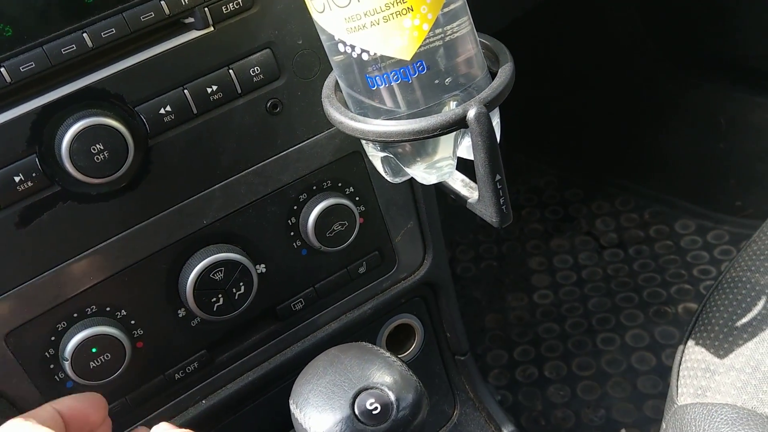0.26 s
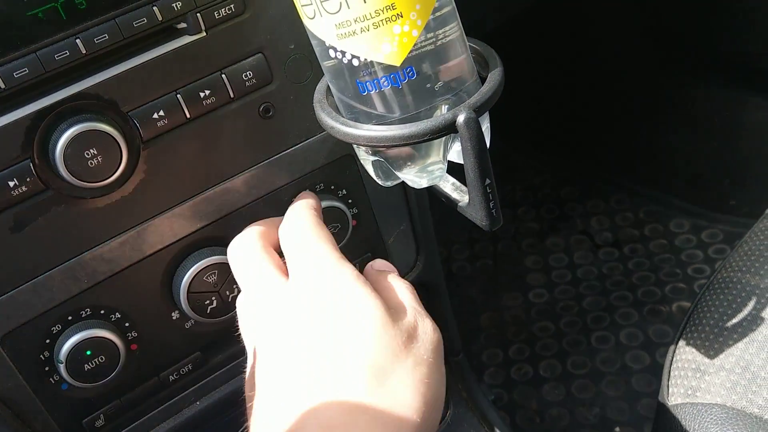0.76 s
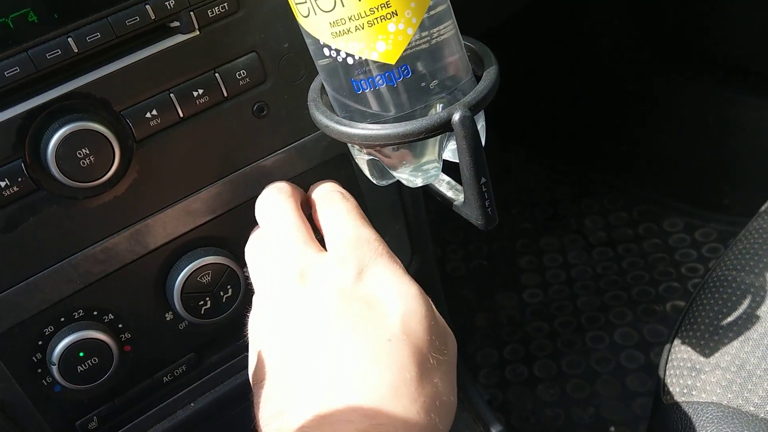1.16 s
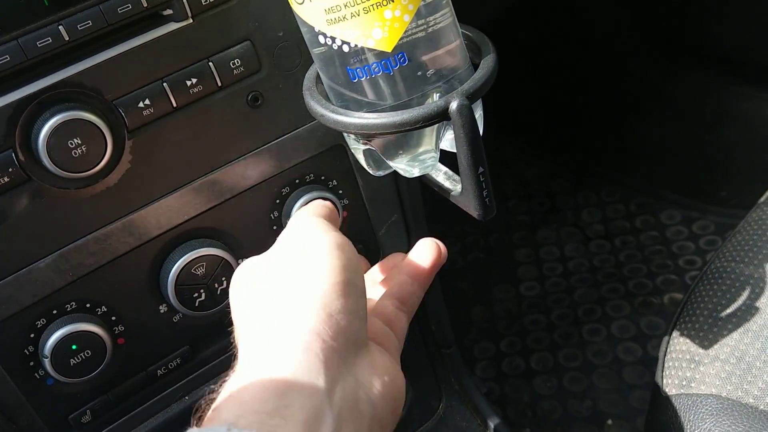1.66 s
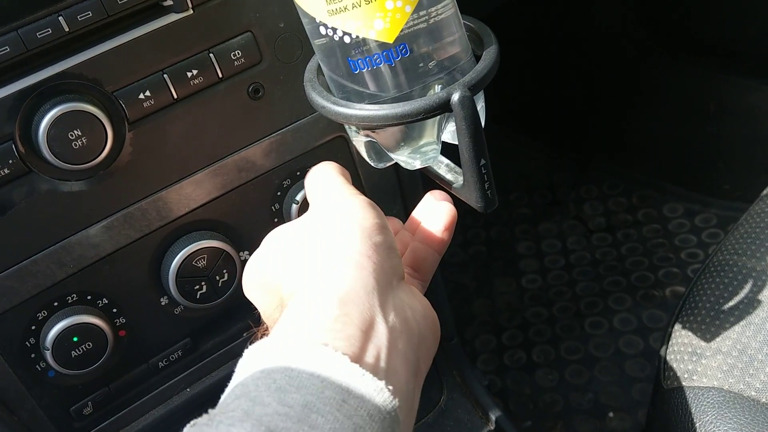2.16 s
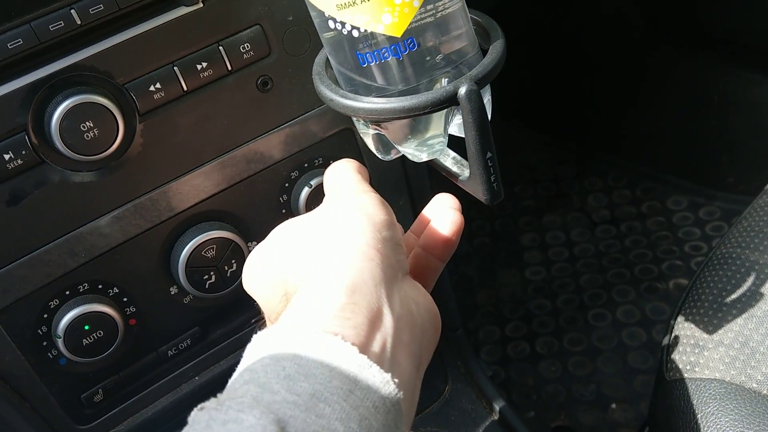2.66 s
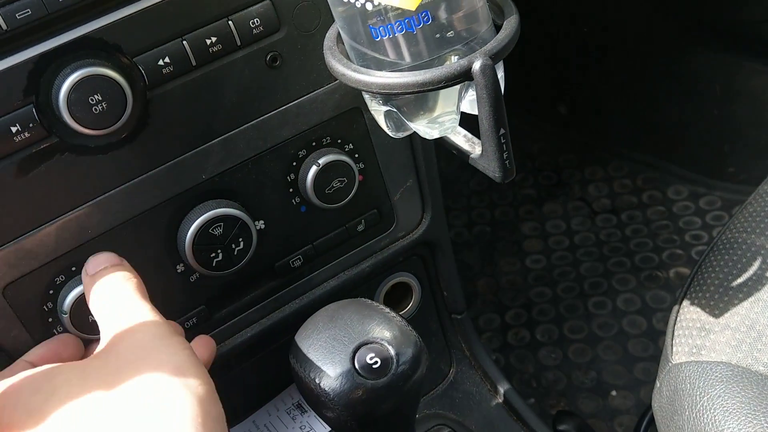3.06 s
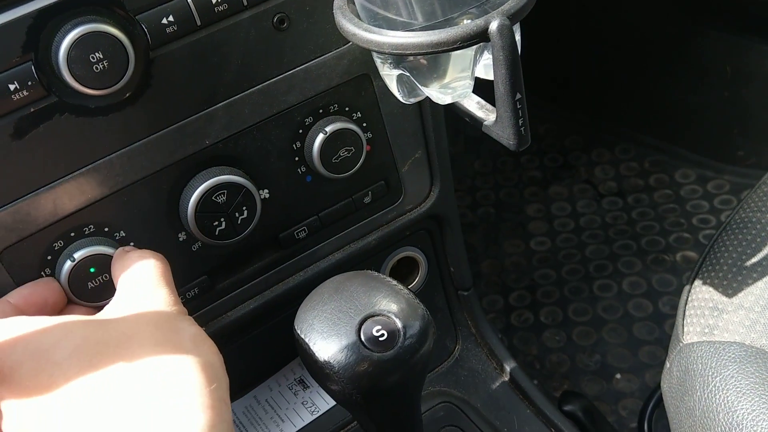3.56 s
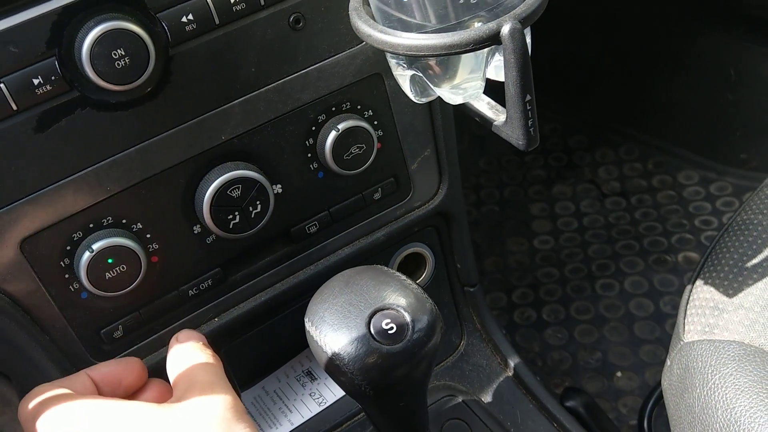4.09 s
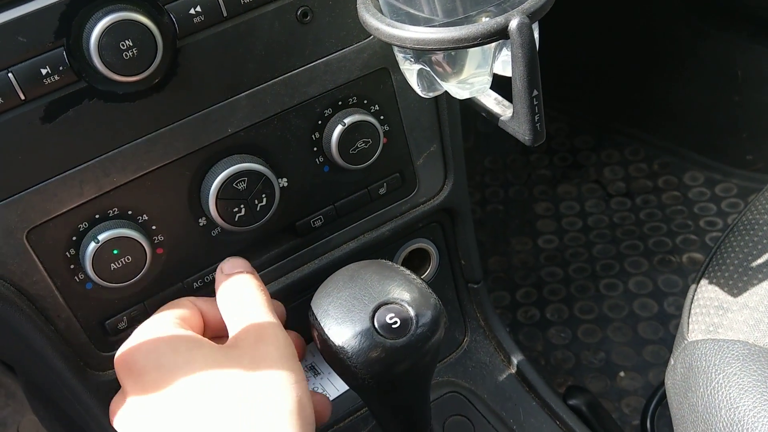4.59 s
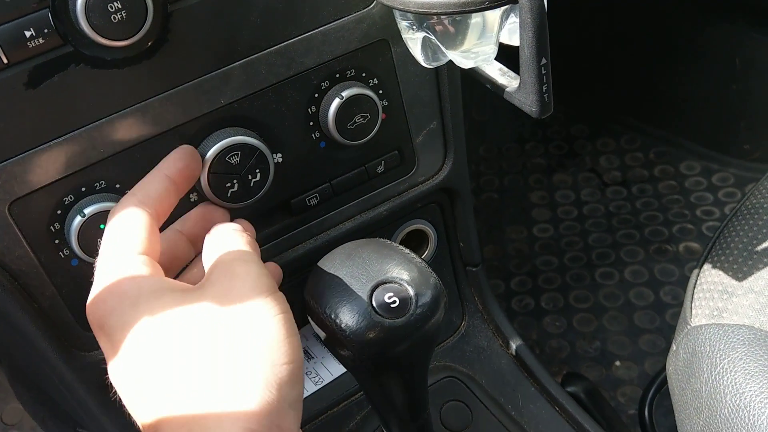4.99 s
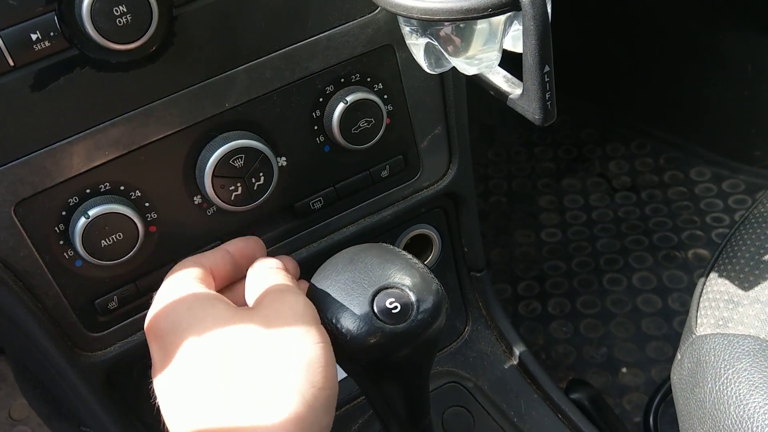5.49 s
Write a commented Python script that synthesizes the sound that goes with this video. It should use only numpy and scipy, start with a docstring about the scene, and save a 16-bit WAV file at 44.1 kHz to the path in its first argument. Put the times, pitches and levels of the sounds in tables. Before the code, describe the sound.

Inside a parked car, the ventilation blower rushes steadily through the ducts, a broad, slightly hollow sound of air over the deep hum of the idling engine. A dial gives two small, bright clicks right at the start and two more at about 1.3 seconds. Through the first three seconds, the air buffets the close microphone in soft low puffs, mostly on the left, strongest between 1 and 1.7 seconds. From about 2.5 seconds the fan winds down, its rush thinning to a faint hiss by 4.5 seconds. A few very faint dial ticks fall between 3.2 and 3.7 seconds. The engine keeps idling throughout, sagging slightly, with a few soft low thumps after 4 seconds. At about 5.4 seconds, thin plastic crackles close by in one quick burst of little snaps.

```python
"""A ventilation blower rushes through the ducts of a parked car, then winds down over the idling engine.
The rush is turbulent air shaped by duct resonances; the engine's firing booms in the cabin.
Wind buffets mainly the left microphone port, a few low thumps reach both, and a hand ticks the dials.
Near the end thin plastic crackles close by."""
import sys
import numpy as np
from scipy import signal
from scipy.fft import rfft, irfft
from scipy.io import wavfile
from scipy.ndimage import uniform_filter1d

SR = 44100
rng = np.random.default_rng(int(sys.argv[2]) if len(sys.argv) > 2 else 0)


def store_pcm(level_fs):
    """Save levels as 16-bit WAV."""
    pcm = np.round(np.clip(level_fs, -1, 1) * 32767).astype(np.int16)
    wavfile.write(sys.argv[1], SR, np.atleast_2d(pcm).T)


N = 252847

# air flow: t/s, level/dB
AIR_FLOW = [(0, -34), (.7, -33.5), (1.34, -33.5), (1.66, -33.5), (2.3, -34.5), (2.65, -36), (2.9, -38),
            (3.14, -41), (3.7, -43.5), (4.05, -45.5), (4.4, -47), (4.68, -48), (4.8, -48.5), (5.03, -49.5),
            (5.35, -49), (5.73, -53)]
FULL_FLOW_DB = -34.5
# left-right likeness of the cabin sound: f/Hz, coherence
COHERENCE = [(60, 0.97), (130, 0.98), (220, 0.99), (400, 0.97), (700, 0.95), (1050, 0.65), (1200, 0.73),
             (1550, 0.052), (2000, 0.84), (2400, 0.77), (2750, 0.64), (2950, 0.17), (4000, 0.21),
             (6000, 0.046)]


def blower():
    """Turbulent air in resonant ducts; the deep bass and the treble fade fastest as the fan slows."""
    spectrum = [(35, -36), (60, 12.5), (66, -7), (127, -3.5), (165, -8.5), (373, -5.5), (490, -9),
                (706, -10), (1840, -18.5), (2420, -20), (3260, -27), (8890, -41), (14000, -71)]  # at full flow: f/Hz, relative level/dB
    balance = [(60, 2.5), (98, -0.5), (160, 0.5), (260, 1), (430, 4), (710, 3), (1160, -1), (1890, 1),
               (3100, -4), (5070, 3.5), (8300, 2.5), (13600, 0.5)]  # f/Hz, L-R/dB
    phase_lead = [(60, 0.2), (200, -0.12), (310, -0.49), (400, 0.014), (490, -1), (900, 0.86),
                  (1200, -0.53), (1400, 1), (1900, -1), (2300, -0.17), (2750, 0.6), (3200, -1.6),
                  (3700, -0.57)]  # f/Hz, left lead/rad
    flow_slope = [(55, 2.5), (125, 0.63), (210, 1.02), (350, 1.3), (700, 1.04), (1400, 1.09), (2500, 1.3),
                  (4000, 1.46), (7000, 1.6)]  # f/Hz, rush per flow/(dB/dB)
    ducts = [(213.3, 49, 9.5, 5), (479, 59, -6, -7), (704, 200, 2.5, 5), (1156, 49, 7, 2), (1344, 65, 4, 6),
             (1540, 170, 3, 4.5), (2110, 126, 0.5, 7), (2145, 56, -16, -8.5), (2462, 64, 4.5, 6),
             (2686, 90, 5, 7), (3045, 105, 7.5, 1), (3310, 93, -7, -1), (3590, 124, 5, 3.5),
             (4210, 310, 0.5, 4.5), (6130, 880, 0, 4.5), (8940, 1000, 3.5, -10), (11600, 1500, 8.5, 8)]  # resonances: f/Hz, width/Hz, left/dB, right/dB
    moan = [(0, 125.5, 7.5), (.4, 134, 10), (.8, 134, 12.5), (1.1, 126, 9), (1.5, 119.5, 8),
            (2.0, 119.4, 15.5), (2.4, 118, 10), (2.6, 112, -2), (3.0, 110, 0.6), (5.73, 104.9, 0.6)]  # low sinking band: t/s, f/Hz, boost/dB
    hollow = [(0, 1.1), (2.8, 1.2), (3.6, 2.2), (4.1, 8.1), (4.5, 7), (4.75, 3.4), (5.0, 0.8), (5.73, 1)]  # narrow duct tone: t/s, boost/dB
    drone = [(0, .3), (2.7, .3), (3.1, 4.5), (3.4, 3), (3.8, 1.65), (4.1, .3), (5.73, .3)]  # brief low swell: t/s, boost/dB
    fizz = [(0, .2), (3.7, .2), (4.1, 1.4), (4.65, 2.5), (4.8, .3), (5.73, .3)]  # lingering treble: t/s, boost/dB

    def shape_db(hz):
        lean_db = read(balance, hz)
        return read(spectrum, hz) + np.array([.5 * lean_db, -.5 * lean_db])

    def change_db(hz, t):
        patches = rng.standard_normal((len(t), len(hz))).T
        patches_db = evened(uniform_filter1d(uniform_filter1d(patches, size=12, axis=0), size=8, axis=1))
        fade_db = read(flow_slope, hz)[:, None] * (columns(AIR_FLOW, t)[0] - FULL_FLOW_DB)
        moan_hz, moan_db = columns(moan, t)
        bands = [(moan_hz, 15, moan_db, moan_db)]  # columns as in ducts
        for centre_hz, width_hz, curve in [(723, 33, hollow), (196, 43, drone), (5500, 3200, fizz)]:
            boost_db = columns(curve, t)[0]
            bands.append((centre_hz, width_hz, boost_db, boost_db))
        swayed_hz = np.outer(hz, 1 + 0.0038 * wander(t, 1.8))  # the hand-held microphone drifts
        return peaked(fade_db + patches_db + 0.21 * wander(t, 6.5), swayed_hz, ducts + bands)

    rush = noise(shape_db, change_db, lambda hz: read(COHERENCE, hz), lambda hz: read(phase_lead, hz))
    return gain_of(-33) * rush


def fan_shaft():
    """Faint hum at the rotation rate, sinking with the flow."""
    full_speed_hz, hum_re_flow_db = 53.1, -8
    flow_db = uniform_filter1d(columns(AIR_FLOW, np.arange(N) / SR)[0], size=20000)
    speed = gain_of((flow_db - FULL_FLOW_DB) / 3)  # air noise power ~ speed^6
    turns = np.cumsum(full_speed_hz * speed) / SR
    return gain_of(flow_db + hum_re_flow_db) * np.sin(2 * np.pi * turns)


def engine():
    """Uneven firing booms in the cabin with weaker wavering orders, over body rumble."""
    idle = [(0, 37.83, -27.5), (1.3, 38.45, -28), (2.1, 37.66, -28.5), (3.0, 37.08, -29), (4.2, 36.73, -30),
            (4.75, 35.87, -31.5), (5.3, 34.86, -32.5), (5.73, 36.2, -29.5)]  # t/s, firing rate/Hz, level/dB
    orders = [(0.501, -22), (.62, -17), (.75, -28), (1.998, -22), (3, -17.5)]  # multiple of firing rate, level re hum/dB
    body = [(5, -35), (16, -1), (28, 3), (45, 3), (90, -10.5), (200, -21), (400, -16), (1500, -32),
            (4200, -53.5)]  # rumble spectrum: f/Hz, relative level/dB
    uneven_hz, uneven_db, rumble_db = 0.39, 0.16, -42
    t = np.arange(N) / SR

    def waver(top_hz):
        return np.interp(t, t[::200], wander(t[::200], top_hz))

    firing_hz, hum_db = columns(idle, t)
    cycles = np.cumsum(firing_hz + uneven_hz * waver(23)) / SR
    hum = gain_of(hum_db + uneven_db * waver(23)) * np.sin(2 * np.pi * cycles)
    for order, db in orders:
        gain = gain_of(hum_db + db + 2.7 * waver(14))
        hum += gain * np.sin(2 * np.pi * (order * cycles + 0.2 * waver(14) + rng.random()))
    rumble = noise(lambda hz: read(body, hz), lambda hz, t: 0,
                   lambda hz: 0.89 * read(COHERENCE, hz), size=8192)
    return np.sqrt(2) * hum * sides(0.57) + gain_of(rumble_db) * rumble


def buffets_and_thumps():
    """Wind buffets, mostly at the left port, and low thumps at both; each swings for about a cycle."""
    pulses = [(0.078, -21, 200, -3), (0.329, -24, 131, -4), (0.913, -21, 220, -3), (1.061, -19, 150, -9),
              (1.068, -12.5, 300, -13), (1.071, -15.5, 120, -7), (1.078, -19, 150, -11),
              (1.175, -25, 110, -20), (1.194, -19, 100, -20), (1.557, -17, 124, -12), (1.571, -17, 240, -9),
              (1.566, -11.5, 200, -14), (1.638, -17, 185, -17), (1.678, -15, 188, -15),
              (1.719, -17, 270, -20), (1.967, -16.5, 120, -1.5), (2.183, -16, 204, -20),
              (2.562, -17, 200, -24), (2.571, -19.5, 110, -17), (2.82, -21, 220, -20),
              (2.834, -21, 230, -12), (2.838, -16.5, 230, -11), (2.843, -22, 120, -8),
              (3.898, -36, 90, -20), (4.179, -35, 75.6, -25), (4.354, -25, 76, -18.5),
              (4.462, -34, 130, -20), (4.684, -38, 159, -20), (5.02, -40, 85, -20), (5.176, -31, 59.7, -22),
              (5.224, -38, 141, -16), (5.318, -36, 95.3, -18), (5.556, -28, 95, -20),
              (5.584, -23, 161.5, -15)]  # single buffets and thumps: t/s, peak level/dB, f/Hz, R-L/dB
    gusts = [(1.157, .07, -32, 70), (1.499, .025, -23, 170), (1.621, .145, -24, 144), (2.8, .04, -28, 140),
             (4.207, .19, -34.5, 99), (4.619, .09, -36, 139), (5.588, .035, -36, 110)]  # spells of small eddies: t/s, length/s, typical level/dB, typical f/Hz
    width_cycles = 0.81
    small_eddies = [eddy for row in gusts for eddy in gust(*row)]
    out, t = np.zeros((2, N + 4000)), np.arange(-2000, 2000) / SR
    for at_s, db, hz, right_db in pulses + small_eddies:
        envelope = np.exp(-abs(2 * hz * t / width_cycles) ** 1.22)
        swing = envelope * np.cos(2 * np.pi * (hz * t + 0.13 * rng.standard_normal()))
        out[:, round(at_s * SR):][:, :4000] += gain_of([[db], [db + right_db]]) * swing
    return out[:, 2000:N + 2000]


def gust(start_s, length_s, db, hz):
    """Rows of small eddies, varied in size and pitch, that barely reach the right port."""
    eddies_per_s, spread_db, spread_oct, right_db = 90, 4, 0.73, -26
    jitter, size, pitch = rng.standard_normal((20, 3))[:round(length_s * eddies_per_s)].T
    at_s = start_s + (np.arange(len(jitter)) + .5 + 0.305 * jitter) / eddies_per_s
    return zip(at_s, db + spread_db * size, hz * 2 ** (spread_oct * pitch), np.full(len(at_s), right_db))


def plastic_crackle():
    """Thin plastic snaps singly and in one dense burst that swells and dies."""
    snaps = [(5.3443, -50.5, 6, 0), (5.3974, -47.5, 2, 0.3), (5.404, -54, 2, 4), (5.4115, -47.5, 1, 3),
             (5.4248, -44, 7, -1.5), (5.4343, -39, -1, 0), (5.4429, -39, 2, -1.5),
             (5.4501, -33.5, -2, -2.5), (5.4555, -36, 8, -4), (5.4595, -32, 4, -5), (5.4655, -34.5, -3, -4),
             (5.471, -38.5, 3, 0), (5.476, -40, 1, -1), (5.482, -41, 3, -0.5), (5.488, -48, -2, 2),
             (5.4931, -38.5, 2, -3), (5.5, -46, -3, 2), (5.5096, -48, 2, 3.5), (5.517, -55, 0, 6.5),
             (5.544, -58, 0.5, 6.5)]  # t/s, level/dB, L-R/dB, dullness/(dB/oct)
    spectrum = [(250, -23), (550, -5), (1100, -2.5), (2200, -10.5), (3500, -11), (7000, -20.5),
                (10000, -25), (12300, -25.5), (14200, -39)]  # f/Hz, relative level/dB
    rings = [(1106, 350, 6.5, 5), (2030, 520, 4.5, 12), (2820, 500, 0, 2), (3930, 210, 0, 11),
             (4670, 600, 7, 6), (6170, 420, 9, 12), (7930, 800, 13, 12), (9130, 800, 13.5, -1),
             (11300, 1020, 9, 9)]  # resonances: f/Hz, width/Hz, left/dB, right/dB
    peak_s, peak_db = 5.466, -40.5
    rise_s, fall_s = 0.031, 0.034  # between peak and -10 dB
    grains_per_s, grain_decay_s = 1500, 0.0008
    after_s = np.arange(N) / SR - peak_s
    burst_db = peak_db - 10 * np.minimum(after_s / np.where(after_s < 0, -rise_s, fall_s), 5) ** 2
    grains = gain_of(3 * np.minimum(rng.exponential(1, N), 4)) * (rng.random(N) < grains_per_s / SR)
    envelope = signal.lfilter([1], [1, -np.exp(-1 / (grain_decay_s * SR))], grains)
    burst = evened(envelope * port_noise(N, common=0.56, own=0.9)) * gain_of(burst_db)
    singles = clicks(snaps, t60_s=0.056, rise_s=0.00021, crack_db=6)
    return coloured(singles + burst * sides(1), spectrum, rings)


def dial_ticks():
    """A hand turns the dials: small bright clicks."""
    ticks = [(0.1146, -37.5, 6, -1), (0.1354, -44, 5, 1), (1.3209, -41.5, 3, 0), (1.3454, -44, 2.5, -3),
             (3.2326, -61, -3, 11), (3.4555, -63, 6.5, 1), (3.492, -53, 4, 2), (3.5574, -61.5, 3, 10),
             (3.6298, -52, 1, 6), (3.6626, -55, 2, 0)]  # t/s, level/dB, L-R/dB, dullness/(dB/oct)
    spectrum = [(1200, -8), (2800, -0.5), (4500, -2.5), (6500, -7), (8000, -8.5), (9300, -19), (10500, -22),
                (14000, -32)]  # f/Hz, relative level/dB
    rings = [(7750, 1200, 3, -1), (8800, 700, 6, 2)]  # resonances: f/Hz, width/Hz, left/dB, right/dB
    return coloured(clicks(ticks, t60_s=0.069, rise_s=0.0005, crack_db=3), spectrum, rings)


def clicks(rows, t60_s, rise_s, crack_db):
    """Each click is a crack and a short noise rattle with its own colour, tilted about 6 kHz."""
    crack_s, bump_db, bump_width_hz = 0.0014, 2.1, 890
    out, t, hz = np.zeros((2, N + 4096)), np.arange(4096) / SR, np.fft.rfftfreq(4096, 1 / SR)
    attack = (1 - np.exp(-t / rise_s)) * (1 + gain_of(crack_db) * np.exp(-t / crack_s))
    for at_s, db, lean_db, dull_db_per_oct in rows:
        white = port_noise(4096, common=0.45, own=0.74)
        bumps_db = bump_db * np.interp(hz / bump_width_hz, np.arange(40), rng.standard_normal(40))
        tilt_db = dull_db_per_oct * np.log2((hz + 1000) / 7000)
        rattle = irfft(rfft(white) * gain_of(bumps_db - tilt_db))
        envelope = attack * gain_of(db - 60 * t / t60_s)
        out[:, round(at_s * SR):][:, :4096] += sides(lean_db) * envelope * rattle
    return out[:, :N]


def coloured(x, spectrum, rings):
    """Filters by the struck part's minimum-phase response, at unit mean energy."""
    hz = abs(np.fft.fftfreq(4096, 1 / SR))
    log_gain = np.log(gain_of(peaked(read(spectrum, hz), hz, rings)))
    taps = np.fft.ifft(np.exp(log_gain - 1j * signal.hilbert(log_gain).imag)).real[:, :1024]
    return signal.oaconvolve(x, taps / np.sqrt(np.sum(taps ** 2) / 2), axes=1)[:, :N]


def peaked(db, hz, peaks):
    """Adds resonances, each with its own height at the left and right port."""
    for centre_hz, width_hz, left_db, right_db in peaks:
        shape = 1 / (1 + (2 * (hz - centre_hz) / width_hz) ** 2)
        db = db + np.array([left_db * shape, right_db * shape])
    return db


def noise(shape_db, change_db, coherence, lead_rad=np.zeros_like, size=2048):
    """Stereo noise shaped by shape_db(hz), set to rms 1, then varied by change_db(hz, t)."""
    def to_samples(spectra):
        return signal.istft(spectra, nperseg=size, noverlap=size - hop)[1][:, :N]

    hop = size // 4
    hz, t = np.fft.rfftfreq(size, 1 / SR), np.arange(N // hop + 5) * hop / SR
    a, b, c, d = rng.standard_normal((len(t), len(hz), 4)).T
    left, unrelated = a + 1j * b, c + 1j * d
    alike = np.clip(coherence(hz), 0, 1)[:, None]
    right = alike * left * np.exp(-1j * lead_rad(hz))[:, None] + np.sqrt(1 - alike ** 2) * unrelated
    steady = np.array([left, right]) * gain_of(shape_db(hz))[..., None]
    return to_samples(steady * gain_of(change_db(hz, t))) / np.sqrt(np.mean(to_samples(steady) ** 2))


def port_noise(n, common, own):
    """White noise, partly alike at both ports."""
    white = rng.standard_normal((3, n))
    return common * white[0] + own * white[1:]


def wander(t, top_hz):
    """Slow random drift of rms 1."""
    rates_hz = np.geomspace(top_hz / 20, top_hz, 24)
    return evened(sum(np.sin(2 * np.pi * (hz * t + rng.random())) / np.sqrt(hz) for hz in rates_hz))


def gain_of(db):
    """Decibels to amplitude."""
    return 10 ** (np.asarray(db) / 20)


def evened(x):
    """Scales to rms 1."""
    return x / np.sqrt(np.mean(x ** 2) + 1e-20)


def read(points, hz):
    """Interpolates a table over log frequency."""
    knots_hz, values = np.transpose(points)
    return np.interp(np.log(hz + 1), np.log(knots_hz + 1), values)


def columns(rows, t):
    """Interpolates each column at times t."""
    knots_s, *values = np.transpose(rows)
    return [np.interp(t, knots_s, column) for column in values]


def sides(lean_db):
    """Left and right gains for an L-R level."""
    return gain_of([[.5 * lean_db], [-.5 * lean_db]])


def scene():
    """All sources at the two microphone ports."""
    return blower() + fan_shaft() + engine() + plastic_crackle() + dial_ticks() + buffets_and_thumps()


def record(dry):
    """Microphone hiss, then the band limit."""
    spectrum = [(1000, 0), (5000, 8), (10000, -2), (14000, -20)]  # f/Hz, relative level/dB
    hiss_db, cutoff_hz = -75, 14200
    hiss = gain_of(hiss_db) * noise(lambda hz: read(spectrum, hz), lambda hz, t: 0, np.zeros_like)
    taps = signal.firwin(1023, cutoff_hz, window=("kaiser", 9), fs=SR)
    return signal.oaconvolve(dry + hiss, taps[None], "same")


dry = scene()
out = record(dry)
store_pcm(out)
```